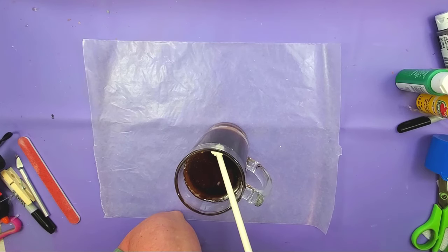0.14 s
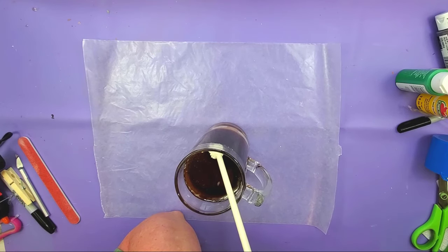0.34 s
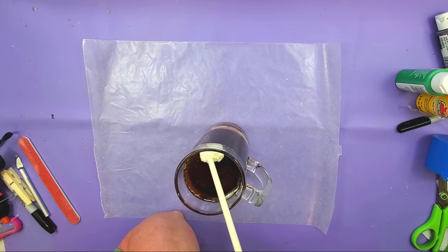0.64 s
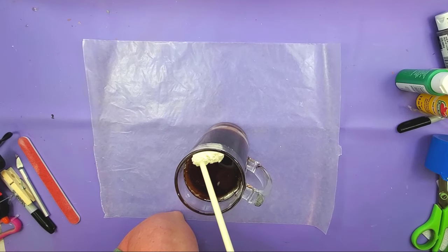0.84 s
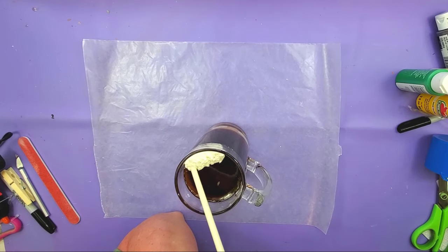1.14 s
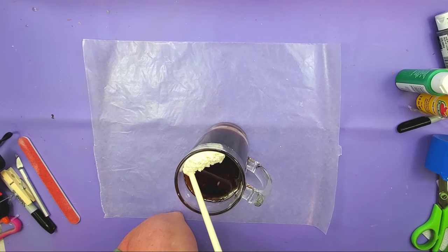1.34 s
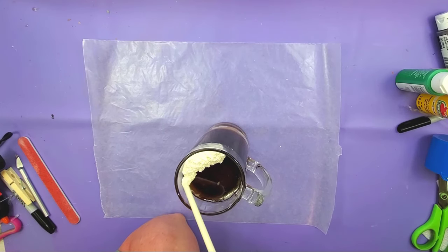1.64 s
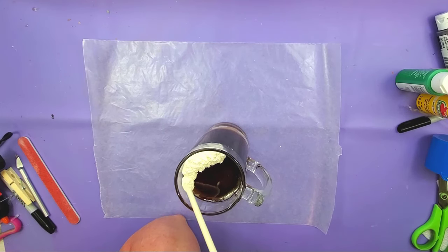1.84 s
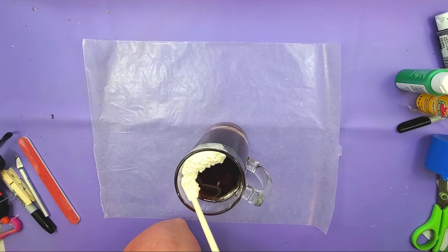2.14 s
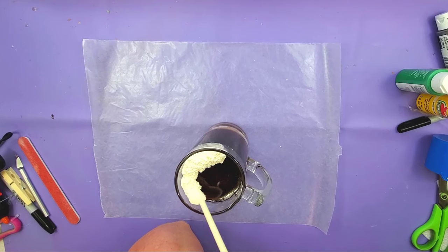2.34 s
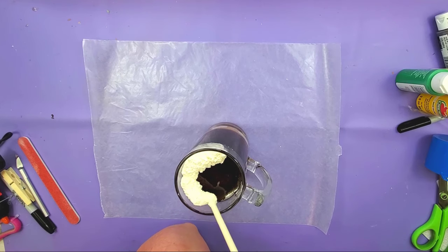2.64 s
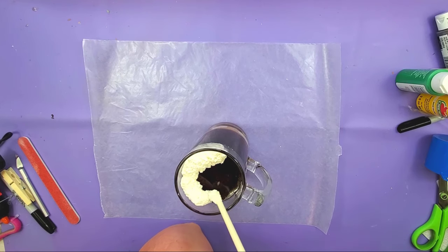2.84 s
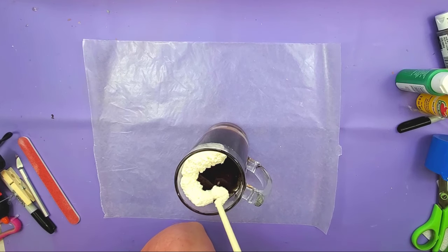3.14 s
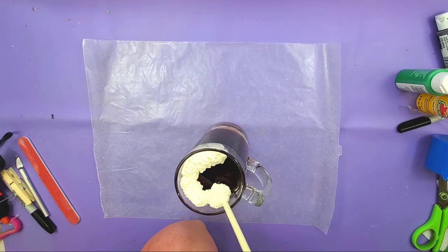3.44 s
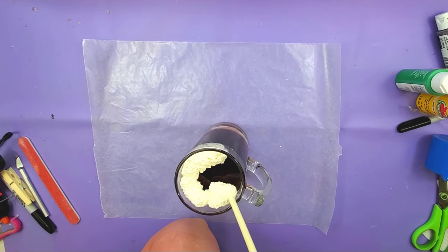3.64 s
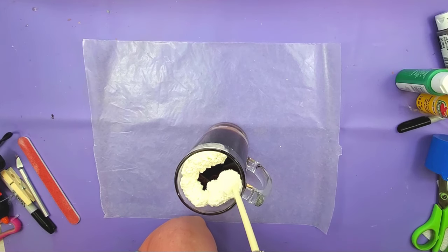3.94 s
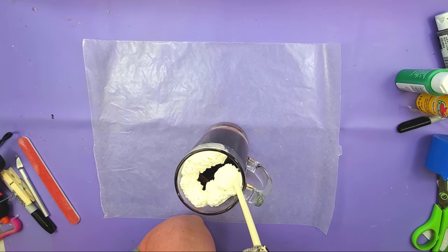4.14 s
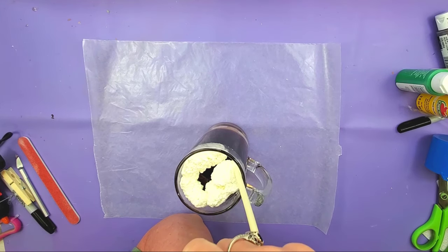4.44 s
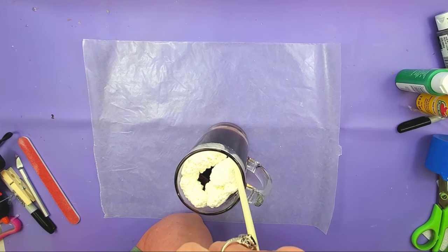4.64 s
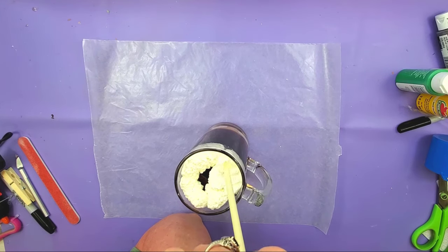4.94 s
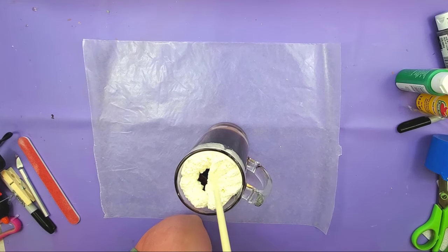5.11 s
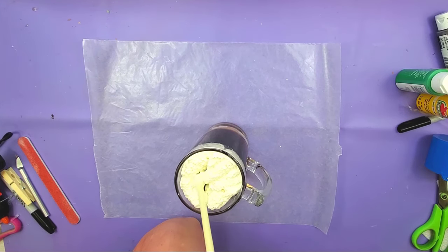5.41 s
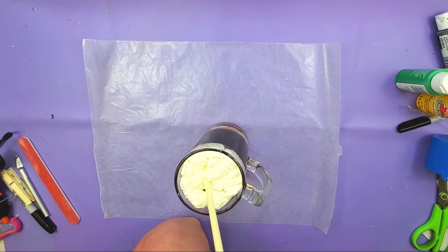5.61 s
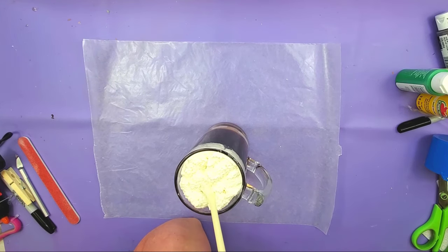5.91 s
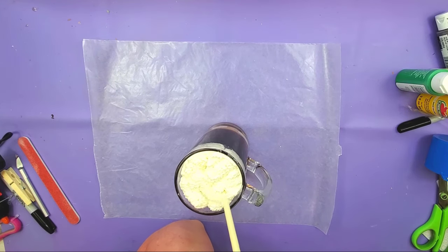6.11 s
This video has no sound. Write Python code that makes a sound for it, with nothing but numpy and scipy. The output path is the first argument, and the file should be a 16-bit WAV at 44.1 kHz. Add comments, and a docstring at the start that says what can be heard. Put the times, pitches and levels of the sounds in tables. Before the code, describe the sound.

Close to the microphone in a quiet, fairly dry room, foam hisses from a thin straw into a glass mug. Small pops and sputters come in uneven surges, thin to a fluttering hiss, then burst into a loud, glassy splutter past the middle. It drops back, returns as a softer, muffled burble and fades into hiss, with faint dull table bumps.

```python
"""Foam from a pressurised can into a glass mug

Foam is squeezed through a thin straw into a glass mug on a table, close to the microphone.
Propellant hisses in the straw all along, while pockets of gas sputter out with the foam and ring the mug.
The sputter swells to a loud splutter, dies back and returns more softly; the hand bumps the table a little.
Hiss and pops are noise and clicks shaped by resonances, over a short tail of reflections and a quiet room."""
import sys
import numpy as np
from scipy import signal
from scipy.fft import rfft, irfft, next_fast_len
from scipy.io import wavfile

SR = 44100
rng = np.random.default_rng(int(sys.argv[2]) if len(sys.argv) > 2 else 0)


def dump_mix(stems):
    """Bounce the given channels to the path in sys.argv[1] as a 16-bit WAV at rate SR."""
    frames = np.atleast_2d(stems).T  # one column per channel
    limited = np.clip(frames, -1, 1)  # hard clip at full scale
    pcm = np.round(limited * 32767).astype(np.int16)
    wavfile.write(sys.argv[1], SR, pcm)


N = 276507
TIME = np.arange(N) / SR

# the largest gas pockets on reaching the tip: arrival_s, peak_db (before the common trim in pockets)
LARGE_POCKETS = [(0.36, -32), (0.384, -26), (0.445, -28), (0.5, -32), (0.642, -22), (0.695, -22.5),
                 (0.761, -20.5), (0.815, -21.5), (0.914, -28), (1.24, -37), (1.729, -27.5), (1.811, -27.5),
                 (2.116, -24.5), (3.197, -33), (3.516, -10.5), (3.619, -4.5), (3.658, -5), (3.673, -6.5),
                 (3.709, -4.5), (3.801, -13), (3.863, -7.5), (3.965, -19), (4.302, -26), (4.544, -23),
                 (4.736, -17.5), (4.908, -23), (4.998, -14.5), (5.097, -15), (5.22, -15), (5.284, -15.5),
                 (5.302, -18), (5.928, -29.5)]
POP_OPEN_S = .0025  # a pocket snaps open this long after it reaches the tip
USUAL_FLOW_DB = -40  # the sputter level that counts as the usual flow


def sputter(level_db, bite_db, crackle_db, burble_db):
    """Small gas pockets burst in quick uneven clusters, more often as the flow grows; they also make the foam burble."""
    # the low burble of the foam: frequency_hz, level_db (per Hz)
    burble_outline = [(30, -25.5), (65, -12), (125, -4), (180, -7.5), (222, 0.5), (265, -5), (325, 0),
                      (370, -5.5), (410, -14.5), (450, -10.5), (510, -16), (700, -7), (1500, -63.5)]
    clusters = undb(4.2 * np.clip(walk(150) + 0.85 * walk(45), -2, 1.6))
    bursts_per_s = 900 * undb(.65 * (level_db - USUAL_FLOW_DB))
    bursts = clicks(rate=bursts_per_s, spread_db=3.5)
    breath = undb(-11.0) * rng.standard_normal(N)
    push = unit(clusters * (bursts + breath))
    ring = mug(push)
    upper_db = level_db - 0.47 - blockage()
    upper = undb(upper_db) * muffle(ring, ring, bite_db, crackle_db)
    slosh = unit(colour(push + undb(3.5) * rng.standard_normal(N), burble_outline))
    return upper + undb(burble_db) * slosh, clusters


def blockage(block_db=3.5, block_s=0.013):
    """Dip in dB as each large pocket plugs the straw just before it bursts."""
    openings = np.array([s + POP_OPEN_S for s, _ in LARGE_POCKETS] + [np.inf])
    wait = openings[np.searchsorted(openings, TIME)] - TIME
    return block_db * np.exp(-(wait / block_s) ** 2)


def mug(push):
    """A burst of gas is heard directly and through the ringing mug."""
    # one burst of gas at the tip: frequency_hz, level_db (per Hz)
    burst_outline = [(300, -30), (530, -12), (680, -4), (1000, -3), (1150, -1.5), (1530, 3.5), (2050, 5.5),
                     (2380, -6.5), (3000, -7), (4150, -13), (4800, -23.5), (8000, -28.5), (15000, -55)]
    # resonances of the mug: frequency_hz, width_hz, gain_db (above the direct sound)
    mug_modes = [(768, 15, -9.5), (850, 8.7, 5), (1065, 13, -5), (1226, 12, 9.5), (1403, 78, -4),
                 (1647, 5.7, 7), (1767, 62, -10), (1850, 5.5, -0.5), (2210, 13, -19), (2230, 10, 10),
                 (2550, 17, -22), (3080, 29, -35), (3766, 38, 1.5), (5400, 240, 10), (7100, 61, -7)]
    burst = colour(push, burst_outline)
    return burst + resonate(burst, mug_modes)


def muffle(x, steady, bite_db, crackle_db):
    """The foam around the tip sets how much mid and treble gets out, each scaled by a band of the steady sound."""
    below_mid = band(x, 200, 1140, order=5)
    below_top = band(x, 200, 2560, order=3)
    body = below_mid / np.std(band(steady, 550, 1150))
    bite = (below_top - below_mid) / np.std(band(steady, 1300, 2400))
    crackle = (x - below_top) / np.std(band(steady, 2700, 4500))
    return body + undb(bite_db) * bite + undb(crackle_db) * crackle


def brightness(surge_db, buried):
    """A stronger flow is brighter; a thin cover of foam takes the crackle, only a deep one the mids as well."""
    bite_db = 1.47 + 0.2433 * surge_db - 16 * buried ** 3
    # the crackle also grows, in dB per s, as the foam climbs towards the rim
    crackle_db = -15 + 0.0052 * surge_db - 12.5 * buried + 3.5 * TIME
    return bite_db, crackle_db


def pops(level_db, bite_db, crackle_db, leak_s=0.0021, vent_s=0.0023, vent_db=-16, size=4096):
    """A large pocket starts to leak, opens with a snap and vents for a few milliseconds."""
    s, peak_db = pockets(level_db).T
    starts = (s * SR).astype(int)
    lead = size // 8  # room for the leak ahead of the snap, samples
    age = (np.arange(size) - lead) / SR
    snap = signal.unit_impulse(size, lead)
    vent_envelope = np.exp(np.minimum(age / leak_s, -age / vent_s))
    vents = rng.standard_normal((len(s), size)) * vent_envelope
    bursts = mug(snap + undb(vent_db) * vents)
    rings = muffle(bursts, mug(snap), bite_db[starts, None] + 0.8, crackle_db[starts, None])
    out = np.zeros(N + size)
    for start, ring, db in zip(starts, rings, peak_db):
        out[start:start + size] += undb(db) * ring / np.abs(ring).max()
    return out[lead:lead + N]


def pockets(level_db, trim_db=-1.57, chance_per_s=4, above_sputter_db=12.5, scatter_db=1):
    """Rows (s, peak dB): the largest pockets, then chance ones whose size follows the flow."""
    slots = rng.random((64, 2))
    s = slots[:, 0] * TIME[-1]
    scatter = scatter_db * rng.standard_normal(len(s))
    peak_db = np.interp(s, TIME, level_db) + above_sputter_db + scatter
    happens = slots[:, 1] < chance_per_s * TIME[-1] / len(s)
    large = np.array(LARGE_POCKETS) + [POP_OPEN_S, trim_db]
    return np.vstack([large, np.c_[s, peak_db][happens]])


def hiss(jet_db, top_db, clusters):
    """The jet fizzes at the tip and sounds the straw; it flutters as foam passes and moves to a sunk-tip tone."""
    # how strongly the jet sounds the straw: time_s, straw_db
    straw_drive = [(0, -5), (1.3, -3), (2.4, -7), (3.3, -4.5), (3.85, 3), (4.35, -0.5), (5.1, -3.5),
                   (6.2, -2.5)]
    # the jet at the tip: frequency_hz, level_db (per Hz)
    fizz_outline = [(500, -37.5), (2500, -7), (4800, -5), (6500, -4), (8200, 3.5), (9400, 7.5),
                    (11000, 5.5), (12400, 5.5), (13900, -6.5), (15100, 0.5), (16000, -23)]
    # air column of the straw with its tip in the open: frequency_hz, width_hz, gain_db
    open_modes = [(1406, 55, 3.5), (1780, 400, 0), (3380, 430, -1), (5600, 310, -2.5)]
    # the same with its tip sunk in foam: frequency_hz, width_hz, gain_db
    sunk_modes = [(1930, 140, -7.5), (2820, 300, -6), (3260, 270, -3), (3970, 410, 0.5), (5690, 240, 1),
                  (7270, 540, -4)]
    straw_db, = curves(straw_drive)
    flow = undb(1.36 * walk(60) + 1.84 * walk(260)) * clusters ** 0.2
    fizz, sizzle = (unit(colour(gas(flow), fizz_outline)) for _ in range(2))
    top = undb(top_db) * band(sizzle, 12600, 20000, order=6)
    tip = band(fizz, 300, 13000, order=6) + top
    open_ring = resonate(gas(flow ** 0.85), open_modes, alternate=False)
    open_tip = unit(band(open_ring, 1100, 9000, order=2))
    sunk_tip = unit(resonate(gas(flow ** 0.93), sunk_modes))
    # the tip sinks deeper as foam piles up around it
    sunk = np.interp(TIME, [.8, 1.5, 3.2, 3.9], [0, .55, .6, 1])
    straw = np.sqrt(1 - sunk) * open_tip + np.sqrt(sunk) * sunk_tip
    return undb(jet_db) * (undb(-0.27) * tip + undb(straw_db) * straw)


def jet_level(choke_s=5.665, choke_half_s=0.041, choke_db=6):
    """Level of the propellant in dB: a slow drift, brief spurts and one choke by a plug of foam."""
    # slow drift of the escaping propellant: time_s, level_db
    jet_drift = [(0, -47), (.6, -43), (1.05, -53), (1.3, -48), (2.14, -45), (2.92, -50), (3.4, -44),
                 (3.68, -40.5), (3.97, -51.5), (4.75, -49.5), (5.06, -54.5), (5.9, -50), (6.27, -56.5)]
    # slugs of pure gas that make the jet spurt: time_s, half_length_s, lift_db
    spurt_rows = [(0.876, .015, 4.5), (1.025, 0.023, 3), (1.825, 0.031, 2), (2.534, 0.016, 10.5),
                  (2.759, 0.018, 7), (3.198, 0.007, 4.5), (3.276, 0.021, 4), (4.68, 0.049, 10),
                  (5.236, 0.071, 9.5), (5.978, .05, 2.5)]
    drift_db, = curves(jet_drift)
    spurts_db = sum(db * swell(s, half_s) for s, half_s, db in spurt_rows)
    return drift_db + spurts_db - choke_db * swell(choke_s, choke_half_s)


def gas(flow, own_db=3.07):
    """Turbulent gas full of tiny bursting bubbles, with a flutter of its own."""
    flutter = undb(own_db * (walk(40) + walk(220)))
    bubbles = undb(-3.5) * clicks(rate=6100, spread_db=7.0)
    return unit(flow * flutter * (rng.standard_normal(N) + bubbles))


def whistle(clusters, s=3.51, half_s=0.33, hz=5570, width_hz=340, level_db=-45.5):
    """At the hardest push the jet drives one resonance of the straw into a breathy whistle."""
    ring = unit(resonate(gas(clusters ** .35), [(hz, width_hz, 0)]))
    return undb(level_db) * swell(s, half_s) * ring


def gulp(s=2.985, half_s=0.0091, hz=432, peak_db=-50):
    """A big bubble sounds softly under the foam, as one short swell of a steady tone."""
    return undb(peak_db) * swell(s, half_s) * np.sin(2 * np.pi * hz * TIME)


def reflections(x, wet_db=-7.5, t60=0.076, size=8000):
    """The table top and near walls add a short tail of decaying noise."""
    t = TIME[:size]
    tail = rng.standard_normal(size) * undb(-60 * t / t60) * (t > .002)
    wet = through(x, tail / np.linalg.norm(tail))
    return x + undb(wet_db) * band(wet, 1400, 11000, order=1)


def bumps(hz=62, rise_s=0.0094):
    """The hand nudges the table, which answers with a short dull thud."""
    # soft bumps of the hand: start_s, peak_db (of the envelope)
    bump_rows = [(3.107, -41), (3.274, -37), (3.33, -47), (4.25, -44), (4.66, -49)]
    out = np.zeros(N)
    for s, peak_db in bump_rows:
        age = np.maximum(TIME - s, 0)
        envelope = age / rise_s * np.exp(1 - age / rise_s)
        out += undb(peak_db) * envelope * np.sin(2 * np.pi * hz * age)
    return out


def forearm_rumble():
    """The forearm resting on the table adds a faint rumble, more as the hand presses harder."""
    # the forearm on the table: time_s, level_db (before a small random waver)
    grip = [(.2, -85), (.75, -57), (1.2, -73.5), (1.75, -62), (2.3, -56.5), (2.9, -66), (3.4, -48.5),
            (4.2, -63), (5.7, -64), (6.27, -69)]
    grip_db, = curves(grip)
    return undb(grip_db + 2.3 * walk(9.3)) * unit(band(rng.standard_normal(N), 39, 180))


def quiet_room(level_db=-64):
    """The room behind it all is steady noise, mostly low."""
    # quiet room: frequency_hz, level_db (per Hz)
    room_outline = [(25, -25.5), (60, 9), (320, 6), (420, -47), (700, -19.5), (1500, -44.5), (15000, -8)]
    return undb(level_db) * unit(colour(rng.standard_normal(N), room_outline))


def undb(db):
    """Decibels to gain."""
    return 10 ** (np.asarray(db) / 20)


def unit(x):
    """Scale to rms 1."""
    return x / np.sqrt(np.mean(x ** 2))


def curves(table):
    """The columns of a table of timed rows, one value a sample."""
    s, *columns = np.transpose(table)
    return [np.interp(TIME, s, c) for c in columns]


def swell(s, half_s):
    """A smooth bell of height 1 around a moment."""
    return np.exp(-((TIME - s) / half_s) ** 2)


def walk(rate):
    """Smooth chance, taking a new random value rate times a second."""
    return 0.64 * np.interp(TIME * rate, np.arange(N // 8), rng.standard_normal(N // 8))


def clicks(rate, spread_db):
    """Randomly timed clicks of either sign and of uneven size; the sparser, the bigger each one."""
    hit = rng.random(N) < rate / SR
    size = undb(spread_db * np.clip(rng.standard_normal(N), -2, 2)) / np.sqrt(rate)
    return unit(hit * np.sign(rng.standard_normal(N)) * size)


def through(x, response):
    """Pass a sound through an impulse response."""
    length = x.shape[-1]
    size = next_fast_len(length + len(response), True)
    return irfft(rfft(x, size) * rfft(response, size), size)[..., :length]


def colour(x, points, size=4096):
    """Causal filter with the given (Hz, dB) outline, made minimum-phase by folding its cepstrum."""
    hz, db = np.transpose(points)
    bins = np.maximum(np.fft.rfftfreq(size, 1 / SR), 1)
    gain = undb(np.interp(np.log(bins), np.log(hz), db))
    cepstrum = irfft(np.log(gain))
    fold = np.r_[1, np.full(size // 2 - 1, 2), np.zeros(size // 2)]
    return through(x, irfft(np.exp(rfft(cepstrum * fold))))


def resonate(x, modes, alternate=True, size=4096):
    """Damped resonances, each with its gain at its centre; without alternating signs, deep valleys lie between."""
    t = TIME[:size]
    response = np.zeros(size)
    for k, (hz, width_hz, db) in enumerate(modes):
        sign = (-1) ** (k * alternate)
        decay = np.exp(-np.pi * width_hz * t)
        response += sign * undb(db) * width_hz * decay * np.cos(2 * np.pi * hz * t)
    return through(x, 2 * np.pi / SR * response)


def band(x, lo_hz, hi_hz, order=4):
    """Band-pass run both ways, so it leaves the timing alone."""
    sos = signal.butter(order, [lo_hz, hi_hz], "band", fs=SR, output="sos")
    return signal.sosfiltfilt(sos, x, padtype="even")


def scene():
    """Sputter, pops and hiss over handling thuds and a quiet room; flow and depth of the tip steer them."""
    # flow of foam out of the straw, in four surges: time_s, level_db (of the sputter)
    foam_flow = [(.16, -76), (.39, -54), (.79, -42), (1.1, -67), (1.58, -68.5), (1.76, -53), (2.08, -48),
                 (2.86, -63.5), (3.33, -46.5), (3.62, -27), (3.87, -29.5), (4.0, -36), (4.32, -47),
                 (4.73, -35), (4.97, -34), (5.06, -37), (5.29, -39), (5.42, -45.5), (6.12, -59.5),
                 (6.25, -76)]
    # how deep the tip is buried in foam: time_s, depth (0-1)
    tip_depth = [(3.6, 0), (3.88, 0.44), (4.15, 0.87), (4.3, 1), (5.0, 1), (5.08, .74), (5.55, 0.63),
                 (5.72, 0.91), (5.95, 0.56), (6.27, 0.83)]
    level_db, = curves(foam_flow)
    buried, = curves(tip_depth)
    surge_db = level_db - USUAL_FLOW_DB
    bite_db, crackle_db = brightness(surge_db, buried)
    # the burble gains with the flow and, in dB per s, as the mug fills
    burble_db = -46.5 + 0.6959 * surge_db + 0.49 * TIME
    foam, clusters = sputter(level_db, bite_db, crackle_db, burble_db)
    sizzle_db = 5.5 - 4.5 * buried  # foam over the tip dulls the top of the jet
    jet = hiss(jet_level(), sizzle_db, clusters) + whistle(clusters)
    can = foam + jet + gulp() + pops(level_db, bite_db, crackle_db)
    return (reflections(can) + bumps() + forearm_rumble() + quiet_room())[None]


def record(dry):
    """The recorder cuts the top steeply above 15.7 kHz."""
    return signal.sosfilt(signal.ellip(12, .1, 80, 15700, fs=SR, output="sos"), dry)


dry = scene()
out = record(dry)
dump_mix(out)
```